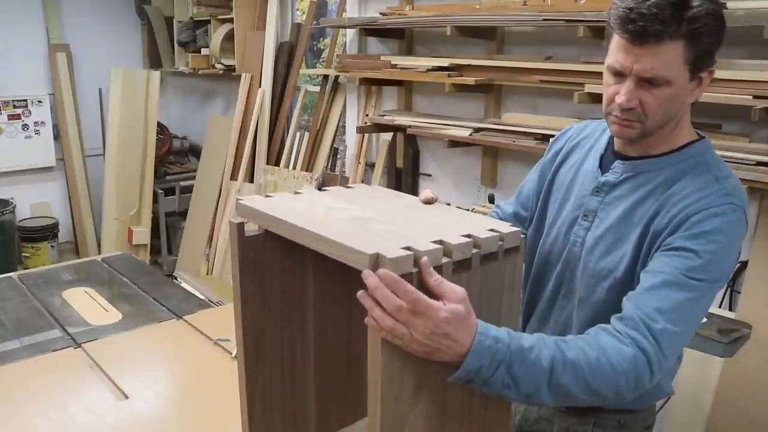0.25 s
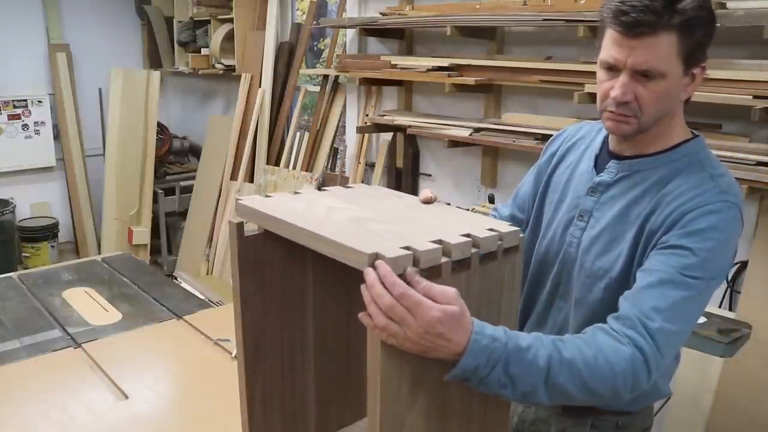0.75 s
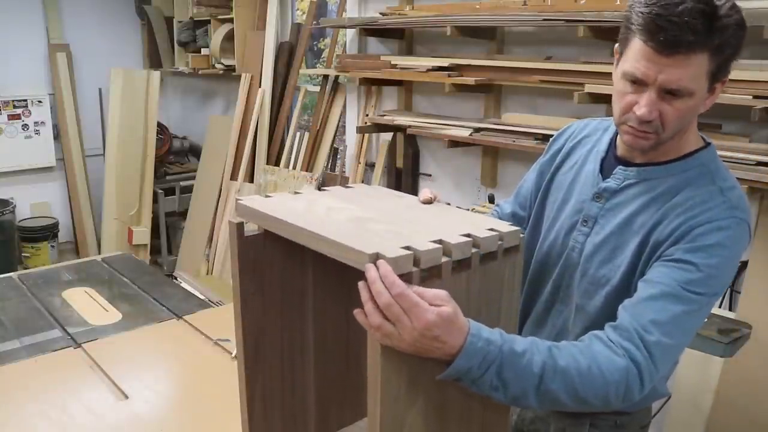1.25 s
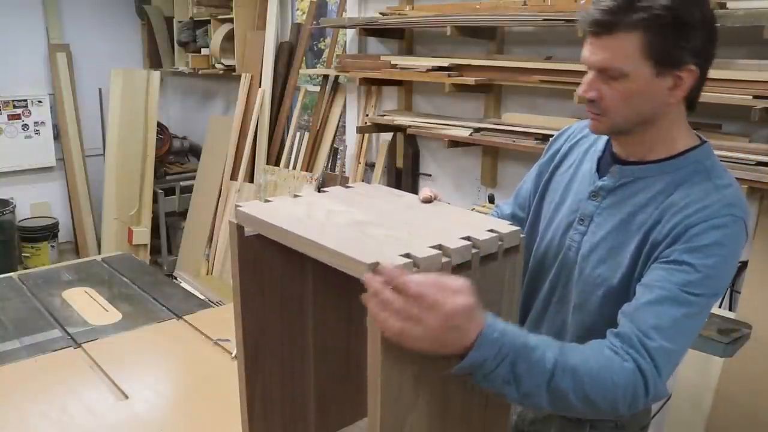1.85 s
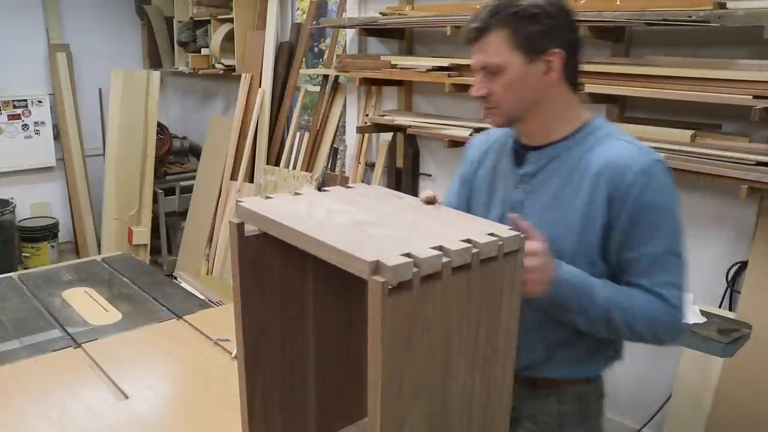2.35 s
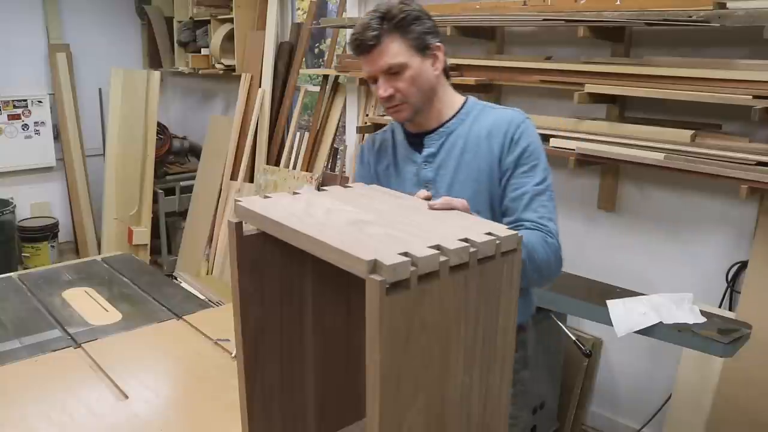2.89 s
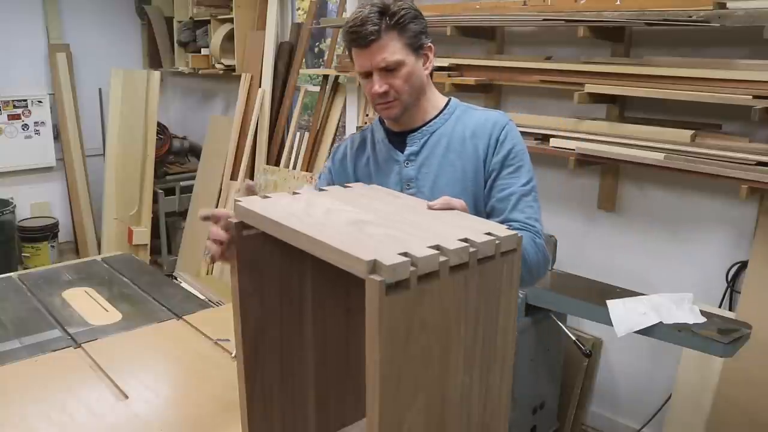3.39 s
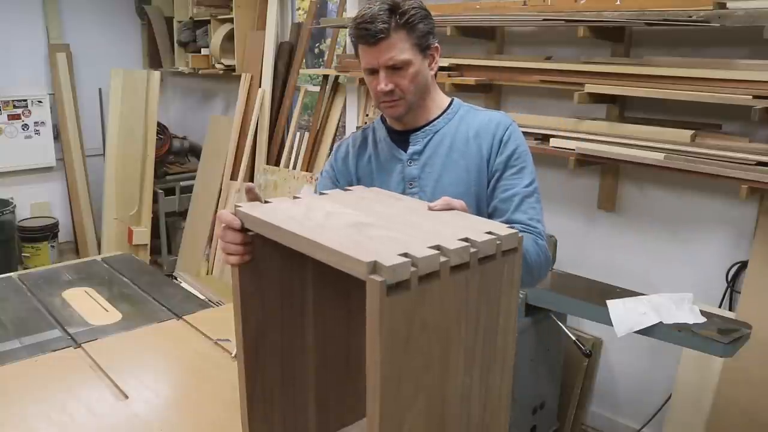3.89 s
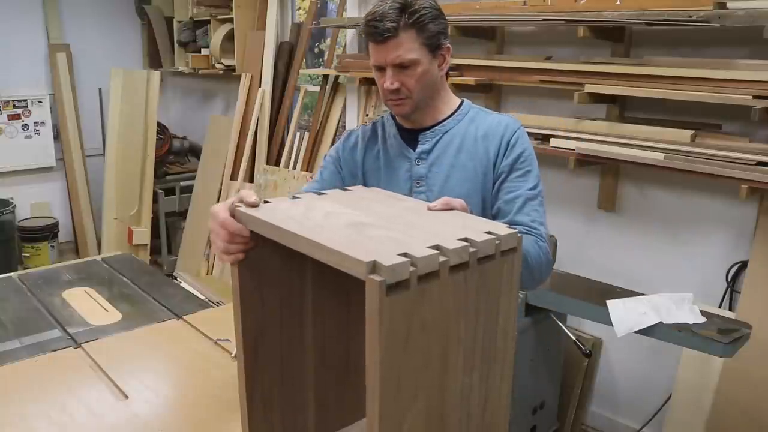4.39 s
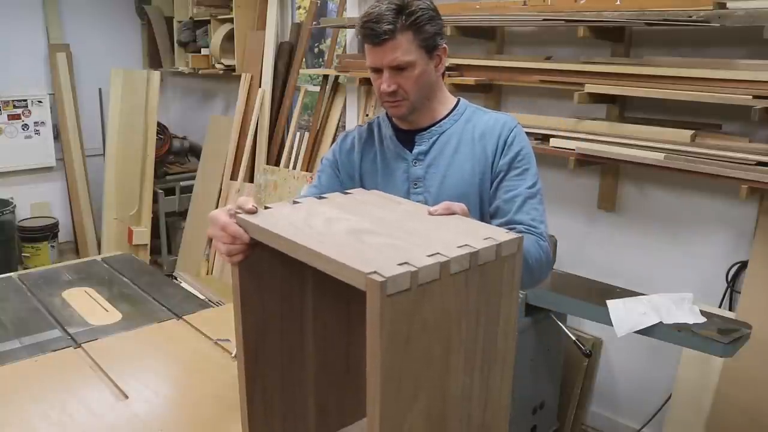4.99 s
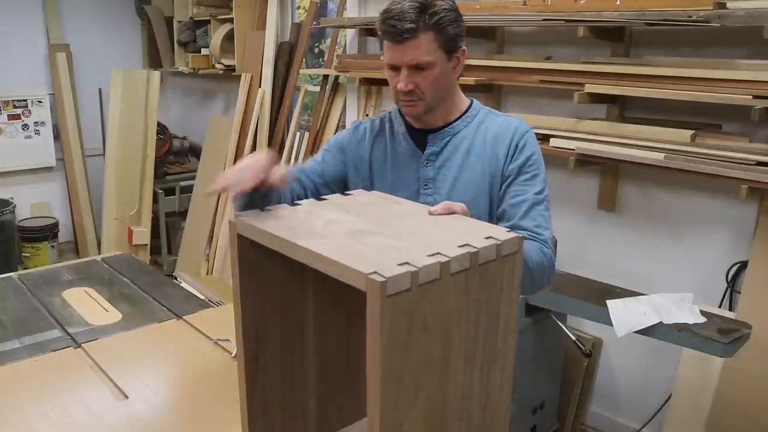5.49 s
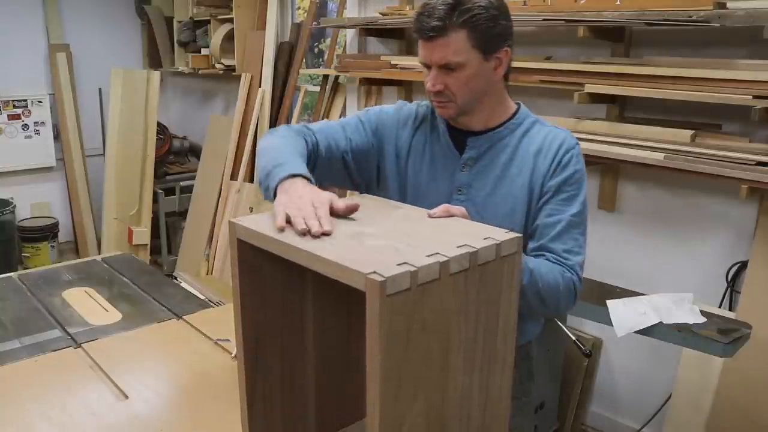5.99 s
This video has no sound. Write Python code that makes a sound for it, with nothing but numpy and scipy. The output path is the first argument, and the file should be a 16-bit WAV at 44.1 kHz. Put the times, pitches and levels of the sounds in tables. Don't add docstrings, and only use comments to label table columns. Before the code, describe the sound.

A hollow wooden case is assembled by hand in a small workshop, heard on one close microphone over faint low room tone and hiss. A soft rubbing stutter opens, and a dull hollow knock lands at 0.2 s. Quiet dry rubbing follows with faint taps, then another clunk at 1.36 s. From 1.8 to 2.4 s there are small knocks, fine finger ticks and a brushing shuffle. Around 2.9 s come a crisp tick and a short scrape. A tight joint slips in a brief rattling stutter at 3.5 s, followed by small woody knocks to 3.75 s. Light rubbing continues until a solid clunk at 4.96 s, with a scuff and smaller knock after. Rubbing swells at 5.6 s, then a palm slaps the top sharply at 5.75 s and harder at 6.01 s, bright crack over short, damped hollow thump, ending in a brief slide of wood.

```python
import sys
import numpy as np
from scipy import signal
from scipy.fft import rfft, irfft
from scipy.io import wavfile
from scipy.ndimage import uniform_filter1d

SR = 44100
rng = np.random.default_rng(int(sys.argv[2]) if len(sys.argv) > 2 else 0)


def ratio(d):
    e = np.asarray(d, float) / 20
    return 10 ** e


def to_wav(s):
    ch = np.atleast_2d(s).T
    pcm = np.round(np.clip(ch, -1, 1) * 32767)
    wavfile.write(sys.argv[1], SR, pcm.astype(np.int16))


N = 275624
TOP_HZ = 15800
STROKE_SWING_DB = 20

# t/s, force/dB, weight behind it/dB, hardness/dB per zone
NEAR_KNOCKS = [(0.002, -45, 3, 3), (0.197, -41, 11, 2), (0.216, -19.5, -12.5, -5.5), (0.39, -58.5, 8, 8),
               (0.476, -50, -40, -9), (0.719, -55.5, 2.5, -10), (1.332, -55, 2, -16), (1.363, -25, -1, -6),
               (1.561, -63.5, 28.5, -10), (1.608, -74, 23, -2), (1.844, -39.5, 3, -18),
               (1.858, -46.5, -0.5, -15), (1.984, -40.5, 7, -15), (2.037, -47.5, -4, -5)]
# t/s, force/dB, weight behind it/dB, hardness/dB per zone
FAR_KNOCKS = [(2.252, -69, -6, 17), (2.581, -43, -9.5, -13), (2.82, -46.5, -16, -4),
              (2.856, -43, -2.5, -20), (2.937, -40.5, -16, 5.5), (2.947, -55, -22, 13), (3.295, -66, 0, 11),
              (3.548, -52, 4, -12), (3.638, -34, -2.5, -4.5), (3.655, -50.5, -6, 10.5),
              (3.68, -36, -20, -27), (3.731, -47, 0, -3.5), (3.921, -51, -19, 5), (4.051, -66, 7, -1),
              (4.564, -50.5, 10, 8), (4.597, -62, 5, 0), (4.957, -22, -2, -0.5), (5.136, -44.5, 7.5, -17),
              (5.199, -58, 9, 8.5), (5.597, -45, -7.5, -9)]
# t/s, force/dB, weight behind it/dB, hardness/dB per zone
SLAPS = [
    (5.7535, -16, -27, 0.5),
    (5.7558, -23, 6.5, 7),
    (5.7615, -12, -17, -0.5),
    (5.778, -16, -26, -20),
    (6.0085, -11.5, 3.5, 5),
    (6.0135, -8.5, -28, -2),
    (6.0165, -17.5, -32.5, 3),
]
# f/Hz, t60/s, level/dB struck at near corner, far corner, top
HOLLOW_MODES = [(46.5, 0.39, 3.5, 7, -5.5), (85.2, 0.34, -1, 0.5, -1), (136.1, 0.15, 2, 8, -5),
                (212.3, 0.098, 3.5, 3.5, -2.5), (245, 0.23, 1, 6, 1.5), (293.6, 0.078, 8, 4.5, 1.5),
                (333, 0.21, 4, 2.5, 3.5), (351.2, 0.16, 5, -3, 4.5), (420.5, 0.053, 7.5, -1.5, 1.5),
                (502, 0.072, -6.5, 6, 1.5), (657, 0.053, -5, 3.5, 4.5), (736, 0.036, 0, -0.5, 5)]
# f/Hz, t60/s, level/dB struck at near corner, far corner, top
BOARD_MODES = [ (835, 0.059, -2.5, -3.5, 5.5), (962, 0.045, 0, 6, -13), (1042, 0.11, 3.5, -8, -7.5),
               (1136, 0.084, 5.5, -7.5, -7), (1295, 0.027, -2.5, -2, 5.5), (1398, 0.061, -1.5, 1, -0.5),
               (1565, 0.035, -14, 7, 2), (1740, 0.03, 0, 5, -6.5), (1997, 0.022, -1, 4.5, -5.5),
               (2145, 0.045, -8, 0, -2), (2520, 0.03, -5, -6.5, -2), (2830, 0.051, -8, -2, -2),
               (3150, 0.02, 1, -4, -2), (3570, 0.0094, -10, -6.5, -2), (4154, 0.018, -7, -11, -5.5),
               (4910, 0.02, -18, -39, -12.5), (5130, 0.04, -16, -26, -23)]
CASE_MODES = HOLLOW_MODES + BOARD_MODES
ZONE_HZ = [110, 350, 1050, 3000]
# t/s, peak/dB, centre f/Hz, length/s
TICKS = [(1.867, -35.5, 10500, 0.0011), (1.903, -33, 9700, 0.00047), (2.042, -40, 10550, 0.0011),
         (2.251, -29, 7900, 0.0014), (2.264, -35, 7900, 0.0028), (2.936, -26, 11000, 0.00064),
         (2.937, -32, 4500, .0008), (3.02, -41, 13000, 0.0044), (3.922, -40.5, 2300, 0.0011),
         (3.923, -40.5, 1000, 0.00078), (4.052, -45, 4600, 0.002), (4.958, -6.5, 740, 0.0022),
         (4.9585, -21, 1870, 0.0014), (5.755, -9.5, 8060, 0.0042), (5.7555, -6, 12800, 0.0015),
         (6.0088, 0, 2300, 0.0032), (6.009, -6.5, 12900, 0.0013), (6.0092, -13.5, 9100, 0.0014),
         (6.0095, -3, 6450, 0.0013)]
# t/s, length/s, level/dB, sag/dB, top f/Hz
STUTTER = [
    (0.0, .1, -42, 10.5, 1200),
    (3.504, 0.11, -38, 24, 4600),
]
# f/Hz, level/dB, t60/s
TAIL_MODES = [(345, -7.5, 0.47), (629, -0.5, 0.12), (790, -13, .04), (1132, 1, 0.065), (1563, 2, 0.038),
              (2300, 0.5, 0.027), (2910, 0.5, 0.045)]
# peak t/s, rise/s, fade/s, pressure/dB, lightness/dB
RUB = [(0.008, 0.011, 0.11, -49, -5.5), (.33, 0.3, 0.13, -54, -10), (.53, 0.14, 0.19, -56.5, -0.5),
       (.67, 0.043, 0.21, -55, 1), (.83, 0.029, 0.11, -62.5, 5), (1.216, 0.04, 0.59, -60, -2),
       (1.35, 0.037, 0.029, -54, 3.5), (1.45, 0.3, .15, -55, -3.5), (1.836, 0.088, 0.26, -46.5, 0),
       (1.984, 0.047, 0.029, -40.5, -6.5), (2.002, .01, 0.21, -52, 0.5),
       (2.253, 0.018, 0.13, -47.5, 5.5), (2.35, .012, .6, -46, -5), (2.386, 0.074, 0.29, -44.5, 1.5),
       (2.576, .03, 0.31, -65.5, 9), (2.672, 0.2, 0.3, -47, 2.5), (2.865, 0.016, 0.45, -55, 9),
           (2.931, 0.23, .05, -51, -1.5), (2.941, 0.0072, 0.035, -34, 4.5), (2.981, 0.043, .2, -45.5, 0),
           (3.3, 0.057, 1, -65, 1), (3.509, 0.0078, 0.36, -52, 4), (3.645, 0.018, 0.16, -41, -1),
           (4.054, 0.013, 0.016, -55.5, 9), (4.4, 1, 0.33, -59.5, 5.5), (4.554, 0.082, 0.19, -42.5, 1.5),
           (4.881, .05, 1, -47.5, 1.5), (4.946, 0.026, 0.03, -38, -2), (4.98, 0.036, 0.21, -40, -8),
           (5.122, 0.01, 0.14, -39, -0.5), (5.378, 0.049, 0.34, -50.5, 3.5), (5.596, 0.0088, 1, -55, -6),
           (5.651, 0.083, 0.13, -37, 1)]
# peak t/s, rise/s, fade/s, pressure/dB, lightness/dB
SLAP_TAILS = [
    (5.775, 0.0083, .17, -30, -1),
    (6.03, 0.014, 1.4, -37.5, -10.5),
    (6.13, 0.16, 0.15, -29.5, -3),
]
RUB_EDGES_HZ = [250, 700, 2000, 5500, 15800]
# level/dB, lightness share/1, fading speed/1, extra pressure ignored/1
RUB_LAYERS = [(0.5, -0.84, 0.99, .01), (0.5, -0.05, 1.13, .01), (-0.53, 0.76, 1.08, 0.036),
              (-16.5, 1.07, 0.95, 0.36)]
# level/dB, lightness share/1, fading speed/1, extra pressure ignored/1
SLAP_TAIL_LAYERS = [(1.3, -0.92, 0.82, .01), (1.3, -0.45, 1.2, .01), (1, 1.1, 1.07, .01), (-29, 1.3, 1.8, .01)]
# t/s, swell/s, fade/s, level/dB,
# centre f/Hz
BRUSHES = [(0.001, .012, 0.18, -42, 740.7), (0.221, .01, 0.1, -39, 940), (1.368, 0.008, 0.079, -40, 1070),
           (1.8, .03, 0.07, -57, 4300), (1.955, .025, .03, -58, 4320), (2.34, 0.053, 0.18, -37.5, 900),
           (2.343, 0.049, .18, -47, 2300), (2.345, 0.042, 0.28, -51, 4630), (2.86, 0.023, 0.078, -60, 5240),
           (2.936, .01, .15, -58, 11500), (4.961, 0.0088, 0.15, -29.5, 644),
           (5.595, .05, 0.036, -48, 10190), (5.62, .04, 0.12, -44, 2840), (5.76, .005, 0.14, -46.5, 9500),
           (6.013, 0.0092, 0.13, -56, 8000), (6.03, 0.12, 0.14, -30, 1030)]
# f/Hz, t60/s, level/dB
SHOP = [(107, 0.45, 2.5), (317, 0.6, -11), (774, 0.51, -4), (2300, 0.53, -5), (6200, 0.57, -9),
        (12100, .15, -51)]
# f/Hz, density/dB per Hz
AIR = [(15, -17), (25, 11), (50, 2.5), (110, -1.5), (691, -18.5), (834, -12), (929, -20), (1220, -14),
       (2200, -19), (2890, -19), (4820, -26.5), (14600, -28), (15800, -28)]


def rms_one(x):
    return x / np.sqrt(np.mean(x ** 2) + 1e-20)


def band(x, low_hz, high_hz):
    edges_hz = [low_hz, min(high_hz, 0.45 * SR)]
    return signal.sosfilt(signal.butter(2, edges_hz, "band", fs=SR, output="sos"), x)


def ring(force, hz, t60_s):
    radius = ratio(-60 / (t60_s * SR))
    angle = 2 * np.pi * hz / SR
    return signal.lfilter([0, np.sin(angle)], [1, -2 * radius * np.cos(angle), radius ** 2], force + 1e-18)


def blows(events, place, contact_s, damping, level_db, touch_hz):
    events, out = np.array(events), np.zeros(N)
    starts = np.round(events[:, 0] * SR).astype(int)
    t = np.arange(900) / SR
    noise = rng.standard_normal((len(starts), len(CASE_MODES), 900))
    for k, (hz, t60_s, *place_db) in enumerate(CASE_MODES):
        force = np.zeros(N + 900)
        for i, (_, force_db, weight_db, hard_db) in enumerate(events):
            zone_db = np.interp(np.log(hz), np.log(ZONE_HZ), [weight_db, 0, hard_db, 2 * hard_db])
            contact = noise[i, k] * np.exp(-t / contact_s)
            contact = 0.55 * contact / np.sqrt(np.sum(contact ** 2))
            contact[0] += (-1) ** k / (1 + (hz / touch_hz) ** 2)
            gain = ratio(force_db + zone_db + place_db[place] + level_db)
            force[starts[i]:starts[i] + 900] += gain * contact
        swell = ring(force[:N], hz, 2.98 / hz) * 8 * hz / SR
        out += ring(swell, hz, damping * t60_s)
    return out


def ticks():
    out, t = np.zeros(N + 900), np.arange(900) / SR
    for s, peak_db, hz, length_s in TICKS:
        contacts = rng.standard_normal(900)
        contacts[0] += 5
        crack = band(contacts * np.exp(-t / length_s), hz / 2.1, hz * 1.3)
        out[round(s * SR):][:900] += ratio(peak_db) * crack / np.abs(crack).max()
    return out[:N]


def grains(per_s, spread_db):
    sizes = ratio(spread_db * np.minimum(rng.exponential(1, N), 4))
    signs = rng.choice([-1, 1], N)
    return rms_one(sizes * signs * (rng.random(N) < per_s / SR))


def stutter():
    slips, force, t = grains(700, 4.1), np.zeros(N), np.arange(N) / SR
    for s, length_s, level_db, sag_db, cut_hz in STUTTER:
        done = np.clip((t - s) / length_s, 0, 1)
        jolt = 12 * (np.arange(N) == round(s * SR) + 100)
        gain = (done > 0) * (done < 1) * ratio(level_db - sag_db * done ** 2)
        force += band((slips + jolt) * gain, 110, cut_hz)
    return ratio(-29) * sum(ratio(mode_db) * ring(force, hz, t60_s) for hz, mode_db, t60_s in TAIL_MODES)


def strokes(rows, layers):
    gains = np.zeros((len(layers), N))
    peaks = [0] + [round(row[0] * SR) for row in rows] + [N]
    for (s, rise_s, fade_s, pressure_db, light_db), a, b in zip(rows, peaks, peaks[2:]):
        t = np.arange(a, b) / SR - s
        for gain, (layer_db, share, speed, ignored) in zip(gains, layers):
            swing = np.where(t < 0, -t / rise_s, speed * t / fade_s)
            peak_db = pressure_db - ignored * (pressure_db + 51.5) + layer_db + share * light_db
            gain[a:b] += ratio(peak_db - STROKE_SWING_DB * swing)
    return uniform_filter1d(gains, size=160)


def lumps(per_s, count):
    knots = rng.standard_normal((count, int(N / SR * per_s) + 2))
    at = np.arange(N) / SR * per_s
    return np.array([np.interp(at, np.arange(len(row)), row) for row in knots])


def rubbing():
    catches, wood = grains(3000, 1.43), np.zeros(N)
    for k, (hz, t60_s, *place_db) in enumerate(CASE_MODES):
        wood += ratio(np.mean(place_db)) * (-1) ** k * rms_one(ring(catches, hz, 0.31 * t60_s))
    wood = rms_one(wood) + ratio(-8) * grains(6000, 2.0)
    edges = zip(RUB_EDGES_HZ, RUB_EDGES_HZ[1:])
    layers = [rms_one(band(band(wood, low, high), low * 0.72, high * 1.47)) for low, high in edges]
    uneven = ratio(2.6 * lumps(60, count=4) + 0.95 * lumps(25, count=1))
    rub_gains = strokes(RUB, RUB_LAYERS) * uneven
    return np.sum((rub_gains + strokes(SLAP_TAILS, SLAP_TAIL_LAYERS)) * layers, axis=0)


def brushes():
    out, t, fibres = np.zeros(N), np.arange(N) / SR, grains(2500, 0.83)
    for s, swell_s, fade_s, level_db, hz in BRUSHES:
        after = t - s - swell_s
        swing = np.where(after < 0, -0.4 * after / swell_s, after / fade_s)
        colour = rms_one(band(band(fibres, hz / 1.8, hz * 1.35), hz / 2.4, hz * 1.4))
        out += (t > s) * ratio(level_db - STROKE_SWING_DB * swing) * colour
    return out


def top_cut(x):
    return signal.sosfilt(signal.cheby2(10, 60, TOP_HZ + 300, fs=SR, output="sos"), x)


def shop(x):
    t, hz = np.arange(SR // 2) / SR, [row[0] for row in SHOP]
    edges = np.sqrt(np.multiply([20] + hz, hz + [30000]))
    tail = np.zeros(len(t))
    for (_, t60_s, level_db), low, high in zip(SHOP, edges, edges[1:]):
        noise = band(rng.standard_normal(len(t)), low, high)
        tail += ratio(level_db - 60 * t / t60_s) * noise / np.sqrt(t60_s * SR / 13.0)
    return signal.fftconvolve(x, tail * (1 - np.exp(-t / 0.0009)))[:N]


def air():
    hz = np.fft.rfftfreq(N, 1 / SR)
    at_hz, density_db = np.transpose(AIR)
    shape = ratio(np.interp(np.log(hz + 1), np.log(at_hz), density_db)) * (hz < TOP_HZ)
    return ratio(-56) * rms_one(irfft(rfft(rng.standard_normal(N)) * shape, N))


def scene():
    near, far, top = range(3)
    case = blows(NEAR_KNOCKS, near, contact_s=0.0044, damping=0.65, level_db=-7.5, touch_hz=1300)
    case += blows(FAR_KNOCKS, far, contact_s=0.0087, damping=0.45, level_db=-6.5, touch_hz=2600)
    case += blows(SLAPS, top, contact_s=0.0039, damping=0.21, level_db=-5.5, touch_hz=9000)
    case += stutter()
    case = signal.sosfilt(signal.butter(4, 60, "high", fs=SR, output="sos"), case)
    cracks = ticks()
    rub = top_cut(ratio(-2.0) * rubbing() + brushes())
    mix = case + cracks + rub + shop(case + ratio(-5) * cracks + 0.59 * rub) + air()
    return np.array([mix, mix])


def band_limit(x):
    return signal.sosfilt(signal.butter(12, 16830, fs=SR, output="sos"), x)


def record(dry):
    dry = signal.sosfilt(signal.butter(2, 36, "high", fs=SR, output="sos"), dry)
    creep_db = 73.0 * np.arange(N) / SR
    over_db = np.maximum(20 * np.log10(np.abs(dry[0]) + 1e-9) + 9.3, 0)
    held_db = np.maximum.accumulate(over_db + creep_db) - creep_db
    keep = np.exp(-1 / (0.0072 * SR))
    duck_db = signal.lfilter([1 - keep], [1, -keep], np.maximum(held_db, 0))
    wet = 0.72 * np.tanh(dry * ratio(-0.6 * duck_db) / 0.74)
    wet = signal.sosfilt(signal.cheby2(12, 60, 16900, fs=SR, output="sos"), wet)
    hiss = ratio(-68.0) * rms_one(band(rng.standard_normal(N), 1100, 0.45 * SR))
    unlike = top_cut(hiss) + ratio(-47) * band(np.roll(wet[0], 90), 20, 1500)
    return band_limit(wet + unlike * [[1], [-1]])


dry = scene()
out = record(dry)
to_wav(out)
```